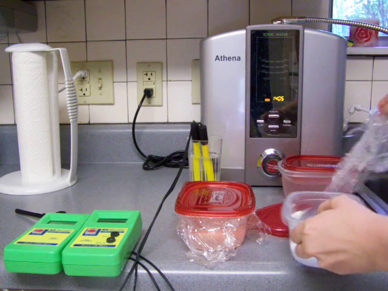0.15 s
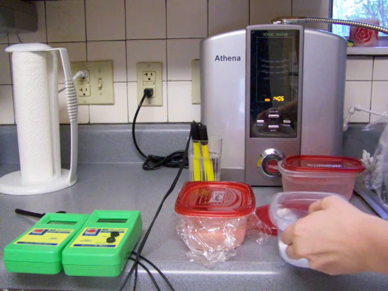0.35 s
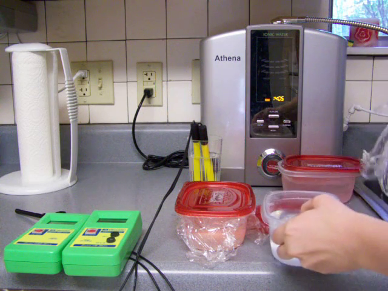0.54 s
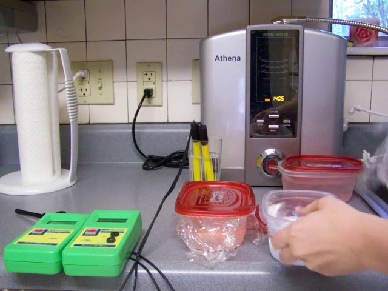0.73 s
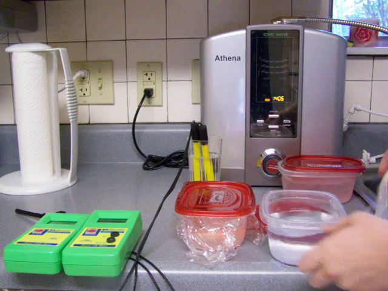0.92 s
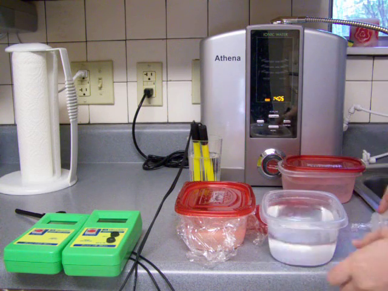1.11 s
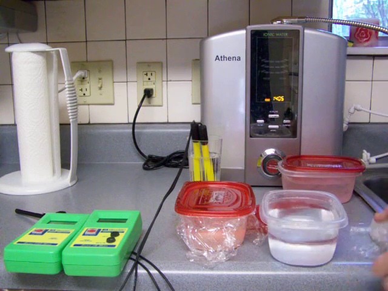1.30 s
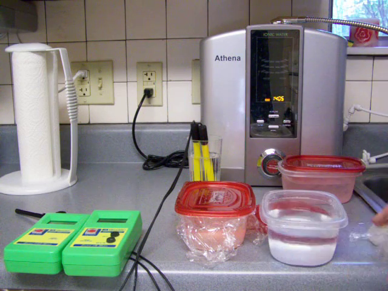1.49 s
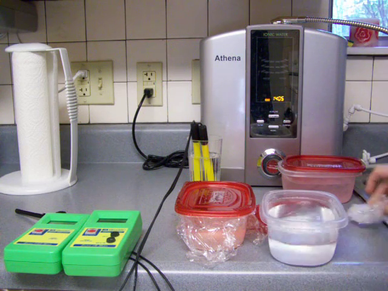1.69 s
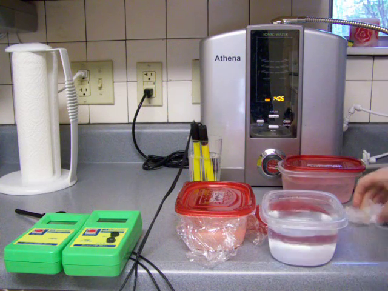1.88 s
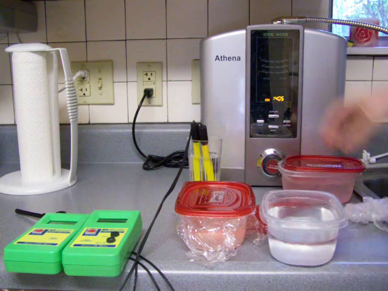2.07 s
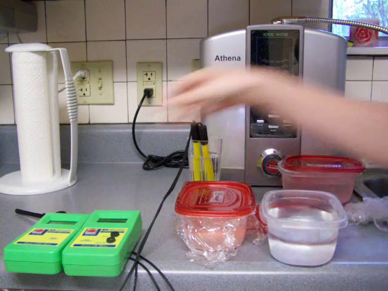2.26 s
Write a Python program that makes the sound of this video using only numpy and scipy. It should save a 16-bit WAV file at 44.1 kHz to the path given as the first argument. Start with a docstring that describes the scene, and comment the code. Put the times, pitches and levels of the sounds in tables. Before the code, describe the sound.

Cling film crinkles sharply as it comes off a light plastic container, which knocks and slides briefly on a counter; then several bursts of crackly bunching, in a tiled room through a small, bright microphone with steady hiss.

```python
"""Cling wrap and a plastic tub

In a tiled kitchen, wrap is pulled off a tub with a clatter and a bright rip; the tub slides over the
counter and is set down, then the wrap crackles through several squeezes of one hand. Film is random clicks
ringing small facets, snaps are noise bursts, knocks are decaying modes and the slide is catching slips.
Near reflections and a short tail surround them; a small microphone peaks near 4 kHz over steady hiss."""
import sys
import numpy as np
from scipy import signal
from scipy.io import wavfile

SR = 44100
rng = np.random.default_rng(int(sys.argv[2]) if len(sys.argv) > 2 else 0)


def wrap_up_sound(samples):
    """Save the sound to the file named by the first command line argument, as 16-bit audio."""
    columns = np.atleast_2d(samples).T
    # keep every value between -1 and 1, then stretch to whole-number steps
    tamed = np.clip(columns, -1, 1)
    steps = np.round(tamed * 32767).astype(np.int16)
    wavfile.write(sys.argv[1], SR, steps)


N = 103635
TIME = np.arange(N) / SR
BINS = np.fft.rfftfreq(4096, 1 / SR)  # frequency grid of the filters, Hz
EDGE_HZ = 9100  # top of the audible band
CREASES_PER_S, CREASE_SPREAD_DB, CREASE_CYCLES = 3600, 4, 1.0
CLUMP_DB, CLUMP_S = 1.5, .005


def amp(db):
    """Decibels to gain."""
    return 10 ** (np.asarray(db) / 20)


def unit(x):
    """Scales to rms 1."""
    return x / np.sqrt(np.mean(x ** 2) + 1e-20)


def read(points, hz):
    """Reads a table on a log-frequency axis."""
    f, value = np.transpose(points)
    return np.interp(np.log(hz + 1), np.log(f), value)


def level(points):
    """Gain over time from a level curve."""
    t, db = np.transpose(points)
    return amp(np.interp(TIME, t, db))


def add(mix, start_s, sound):
    """Mixes a sound in at a time."""
    part = mix[max(round(start_s * SR), 0):][:len(sound)]
    part += sound[:len(part)]


def causal(db):
    """Minimum-phase impulse response of a gain curve."""
    mirrored = np.concatenate([db, db[-2:0:-1]])
    log_gain = np.log(amp(mirrored))
    spectrum = np.exp(np.conj(signal.hilbert(log_gain)))
    return np.fft.ifft(spectrum).real[:len(db)]


def colour(x, points):
    """Filters by a spectrum, keeping the power of the audible band."""
    db = read(points, BINS)
    power = np.mean(amp(db) ** 2 * (BINS < EDGE_HZ))
    return signal.oaconvolve(x, causal(db) / np.sqrt(power))[:N]


def clicks(per_s, spread_db):
    """Random clicks of either sign, many small and a few large."""
    size = amp(spread_db * np.minimum(rng.exponential(1, N), 4.0))
    sign = rng.choice([-1, 1], N)
    present = rng.random(N) < per_s / SR
    return size * sign * present


def clumps():
    """Quick random surges and dips, as contacts give way in groups."""
    knots = np.arange(N) * CLUMP_S
    return amp(CLUMP_DB * np.interp(TIME, knots, rng.standard_normal(N)))


def burst(length_s):
    """Noise with a sharp front and an exponential decay, energy 1."""
    t = TIME[:SR // 10]
    x = rng.standard_normal(len(t)) * np.exp(-t / length_s)
    return x / np.linalg.norm(x)


# Steady hiss under the take: pitch_hz, density_db (relative power per Hz)
HISS_COLOUR = [(20, -2.5), (60, -2), (140, 1.5), (300, -2.5), (600, -3), (1100, -6), (2100, -8), (3400, -4),
               (4200, -5.5), (5500, -6.5), (7200, -12), (9000, -15.5)]
HISS_DB = -53.5


def hiss():
    """Steady random noise with a fixed spectrum."""
    return amp(HISS_DB) * colour(rng.standard_normal(N), HISS_COLOUR)


# How hard the wrap is worked: time_s, level_db (before the scene's balance)
CRUMPLE = [(0, -45), (.045, -50.5), (.085, -52), (.11, -62), (.155, -53), (.17, -42), (.2, -46), (.3, -41),
           (.36, -48.5), (.91, -66), (.935, -41), (.96, -41.5), (1.01, -38.5), (1.08, -39), (1.165, -36),
           (1.2, -48.5), (1.34, -52), (1.39, -41), (1.44, -38.5), (1.465, -41.5), (1.545, -44), (1.57, -36),
           (1.665, -42), (1.705, -40.5), (1.735, -43.5), (1.845, -51.5), (1.873, -34), (1.95, -39),
           (2.015, -39.5), (2.05, -49), (2.11, -57), (2.35, -89)]
# Spectrum of the crackling film: pitch_hz, density_db (relative power per Hz)
FILM_COLOUR = [(100, -35), (600, -28.5), (1200, -16), (2000, -7), (2800, -2), (3400, 0), (4400, -2.5),
               (5500, -3), (7000, -9.5), (8000, -14), (9000, -15.5)]


def crinkle(count=24):
    """Creases buckle at random, each ringing a facet of film for a cycle or two."""
    t, out = TIME[:SR // 100], np.zeros(N)
    for hz in np.linspace(700, 10000, count):
        facet = np.exp(-t * hz / CREASE_CYCLES) * np.cos(2 * np.pi * hz * t)
        facet /= np.linalg.norm(facet)
        buckles = clicks(CREASES_PER_S / count, CREASE_SPREAD_DB)
        out += signal.oaconvolve(buckles, facet)[:N]
    return unit(colour(out * clumps(), FILM_COLOUR)) * level(CRUMPLE)


# Single folds of film snapping: start_s, strength_db (relative), decay_s (time constant)
SNAPS = [(0.049, -10.5, 0.0057), (.1635, -15, .003), (0.2282, 0.5, 0.015), (0.2583, 2.5, 0.0013),
         (.2625, 1, 0.0089), (0.2661, -2, 0.016), (0.283, -6.5, 0.0025), (0.917, -8.5, 0.0054),
         (0.9235, -8, 0.0063), (1.116, -22, .0006), (1.148, -11, 0.00038), (1.175, -17, 0.00077),
         (1.3029, -27, .0005), (1.864, -12, 0.00031), (1.887, -16, .002), (1.995, -8, .0006)]
# Spectrum of the snaps: pitch_hz, density_db (relative power per Hz)
SNAP_COLOUR = [(100, -28.5), (700, -13.5), (1500, -3.5), (2400, -3.5), (3300, -3), (4500, 1), (5900, 1.5),
               (7200, -1.5), (8000, -10.5), (9000, -11.5)]


def snaps():
    """Larger folds let go in short bright bursts."""
    out = np.zeros(N)
    for start_s, strength_db, decay_s in SNAPS:
        add(out, start_s, amp(strength_db) * burst(decay_s))
    return amp(-7) * colour(out, SNAP_COLOUR)


CONTACT_S = 0.0013  # the soft plastic takes this long to ring up


def ring(modes):
    """Decaying modes after one blow."""
    t = TIME[:SR // 8]
    waves = np.zeros(len(t))
    for hz, db, t60 in modes:
        decay = np.exp(-np.log(1000) * t / t60)
        waves += amp(db) * decay * np.sin(2 * np.pi * hz * t)
    return waves * np.minimum(t / CONTACT_S, 1)


# Knocks of the tub, levels relative: start_s, strength_db, thud_db, tick_db, tick_treble_db
KNOCKS = [(0.2047, -14, -2, 4.5, -1.5), (.2070, 4, 3.5, -3, 1), (0.2167, 0.5, -8.5, -4, 8),
          (.22, -5.5, -5, 2.5, 3.5), (0.236, -2.5, -5.5, -6, -4), (0.2489, -8.5, -5, 4, 3.5),
          (.469, -11, -8, 0, -6), (0.473, -14.5, -12, -10, -3), (0.8267, -10, -22, 7, -4.5),
          (0.8339, -3, -5, 1.5, -4.5)]
# Modes of the tub's thud: pitch_hz, level_db (relative), t60_s
THUD_MODES = [(217, -32.5, 0.038), (542, -28, 0.018), (1827, -25.5, .02), (1948, -20, .015)]
# Brighter modes rung by each knock, strongest near 3.7 kHz: pitch_hz, level_db (relative), t60_s
BRIGHT_MODES = [(1157, -25, 0.057), (1250, -35, .04), (2100, -34, 0.034), (3200, -28, .01), (3747, -9, 0.01),
                (4180, -24.5, 0.013)]
# Spectrum of the contact ticks: pitch_hz, density_db (relative power per Hz)
TICK_COLOUR = [(100, -19.5), (700, -13), (1200, -6.5), (2000, -4.5), (2600, -9.5), (3400, 1.5), (4500, 1.5),
               (5800, -7), (7200, -9.5), (9000, -14.5)]
TICK_S, TICK_DB = 0.0031, -5.5  # decay time constant, level offset
TREBLE_HZ = 5300  # softer contacts lose what lies above this


def knocks():
    """Each knock rings bright modes and the tub's base, and adds a contact tick, hard or soft."""
    body, ticks = np.zeros(N), np.zeros(N)
    treble = 1 / (1 + (TREBLE_HZ / (BINS + 1)) ** 10)
    for start_s, strength_db, thud_db, tick_db, treble_db in KNOCKS:
        blow = ring(BRIGHT_MODES) + amp(thud_db) * ring(THUD_MODES)
        add(body, start_s, amp(strength_db) * blow)
        tick = signal.fftconvolve(burst(TICK_S), causal(treble_db * treble))
        add(ticks, start_s, amp(strength_db + tick_db + TICK_DB) * tick)
    return amp(-9.5) * body + amp(-1.5) * colour(ticks, TICK_COLOUR)


# The tub scraping over the counter: time_s, level_db (before the scene's balance)
SLIDE = [(.39, -60), (.43, -40.5), (.475, -37), (.49, -40), (.525, -38), (.58, -45.5), (.62, -43),
         (.675, -42), (.72, -50), (.76, -52), (.8, -80.5)]
# Spectrum of the scrape: pitch_hz, density_db (relative power per Hz)
SCRAPE_COLOUR = [(100, -27), (850, -25.5), (1010, 3), (1400, -2.5), (1750, 3.5), (2200, 0.5), (2750, -7.5),
                 (3000, 6), (3350, -10), (3780, 1.5), (4100, -5.5), (5000, -6), (7000, -15), (9000, -27)]
# Spectrum of the counter under the sliding tub: pitch_hz, density_db (relative power per Hz)
RUMBLE_COLOUR = [(20, -5.5), (50, -1.5), (120, -3), (400, -33.5)]
RUMBLE_DB = -25.5  # relative to the scrape
SLIPS_PER_S, SLIP_SPREAD_DB = 4000, 3.5


def slide():
    """The tub's base catches and slips on the grain of the counter, which rumbles faintly."""
    slips = clicks(SLIPS_PER_S, SLIP_SPREAD_DB) * clumps()
    scrape = unit(colour(slips, SCRAPE_COLOUR))
    rumble = amp(RUMBLE_DB) * unit(colour(slips, RUMBLE_COLOUR))
    return (scrape + rumble) * level(SLIDE)


# Rustle of the wad against the palm: time_s, level_db
PALM = [(.9, -80), (.955, -47), (1.03, -61), (1.09, -50.5), (1.15, -49), (1.22, -64.5), (1.53, -57.5),
        (1.575, -47.5), (1.64, -52), (1.71, -52.5), (1.8, -81), (1.885, -53), (1.93, -59), (2.005, -45.5),
        (2.06, -78)]
# Spectrum of the dull rustle: pitch_hz, density_db (relative power per Hz)
PALM_COLOUR = [(40, -25.5), (150, -5), (320, -0.5), (600, 1), (1200, -1), (2200, 1.5), (3500, -4.5),
               (6000, -21.5)]


def palm():
    """The wad rubs dully against the hand in random clumped clicks."""
    rubs = clicks(CREASES_PER_S, CREASE_SPREAD_DB) * clumps()
    return unit(colour(rubs, PALM_COLOUR)) * level(PALM)


# Reverberation time of the kitchen: pitch_hz, t60_s
ROOM_T60 = [(200, 0.25), (1200, 0.46), (4000, 0.48), (8000, 0.37)]


def room_tail():
    """Diffuse reverberation, each band dying at its own speed, energy 1."""
    size = SR * 3 // 4
    hz, t, bands = signal.stft(rng.standard_normal(size), SR, nperseg=256)
    decay = np.exp(-np.log(1000) * t / read(ROOM_T60, hz)[:, None])
    tail = signal.istft(bands * decay, SR)[1][:size]
    tail *= np.minimum(TIME[:size] / 0.0019, 1)  # builds up over 1.9 ms
    return tail / np.linalg.norm(tail)


# Counter, cupboards and wall tiles, nominal echo delays: delay_s
ECHOES_S = [.0031, .0068, .0097, .0123, .0171]
ROOM_DB, ECHO_DB = -0.5, -6.5  # tail and summed echo energy, relative to the direct sound
MOVE_S = .07  # the reflections change as the hands move


def kitchen(x, count=5):
    """Direct sound, near reflections and a short tail; a cycle of responses crossfades with movement."""
    out = x.copy()
    echo = np.ones(1) * amp(ECHO_DB) / np.sqrt(len(ECHOES_S))
    for k in range(count):
        # distance in steps from this response's turn in the cycle
        away = abs((TIME / MOVE_S - k + count / 2) % count - count / 2)
        fade = np.cos(np.pi / 2 * np.minimum(away, 1))
        response = amp(ROOM_DB) * room_tail()
        for delay_s in ECHOES_S:
            add(response, delay_s * rng.uniform(.9, 1.1), echo)
        out += signal.fftconvolve(x * fade, response)[:N]
    return out / np.sqrt(1 + amp(ROOM_DB) ** 2 + amp(ECHO_DB) ** 2)


def scene():
    """Wrap and tub in the kitchen, over a quiet steady hiss."""
    background = hiss()
    friction = amp(-2.5) * (crinkle() + slide())
    sources = friction + palm() + snaps() + knocks()
    return (kitchen(sources) + background)[None]


# Falling top of the microphone: pitch_hz, gain_db
MIC_TOP = [(7300, 0), (8000, -4.5), (8500, -13), (9000, -28)]
MIC_HZ, MIC_WIDTH_HZ, MIC_DB = 3972, 510, 7  # presence peak: centre, half-width, height


def record(dry):
    """The microphone's presence peak and falling top, then the band limit."""
    peak_db = MIC_DB / (1 + ((BINS - MIC_HZ) / MIC_WIDTH_HZ) ** 2)
    response = causal(peak_db + read(MIC_TOP, BINS))
    heard = signal.oaconvolve(dry, response[None])[:, :N]
    band_limit = signal.firwin(701, EDGE_HZ, window=("kaiser", 9), fs=SR)
    return signal.oaconvolve(heard, band_limit[None], "same")


dry = scene()
out = record(dry)
wrap_up_sound(out)
```